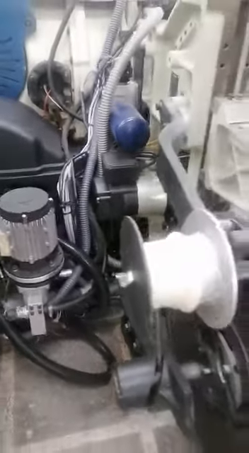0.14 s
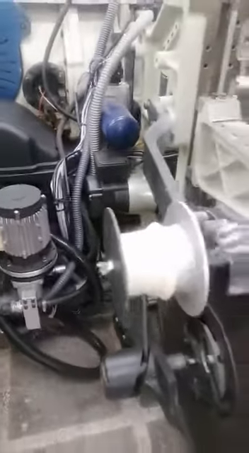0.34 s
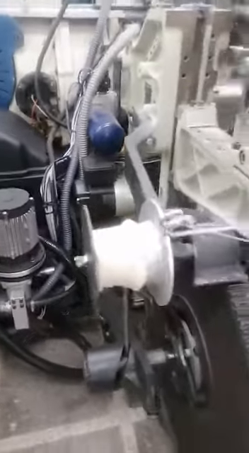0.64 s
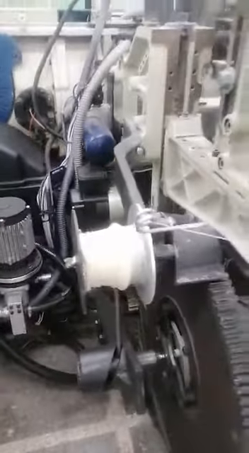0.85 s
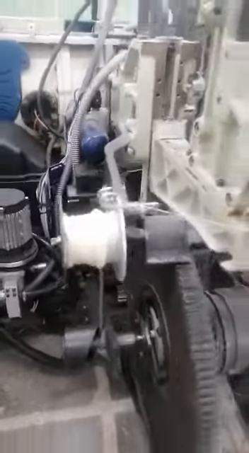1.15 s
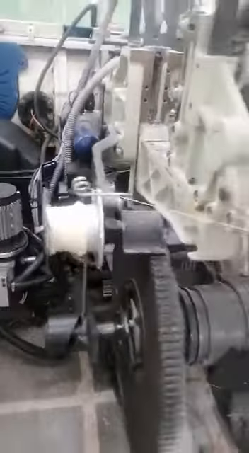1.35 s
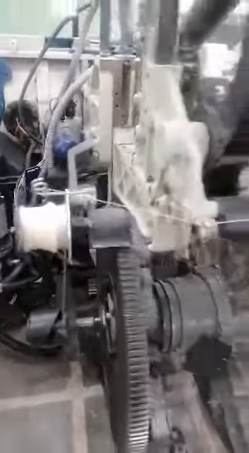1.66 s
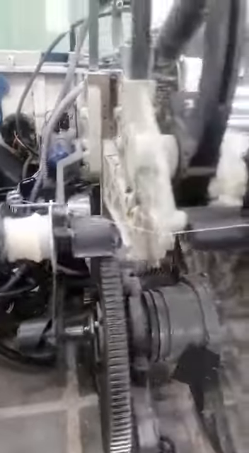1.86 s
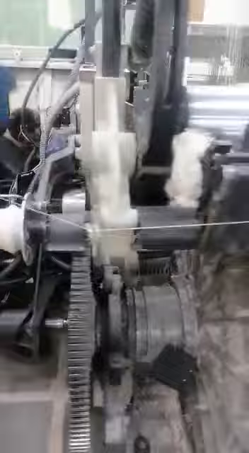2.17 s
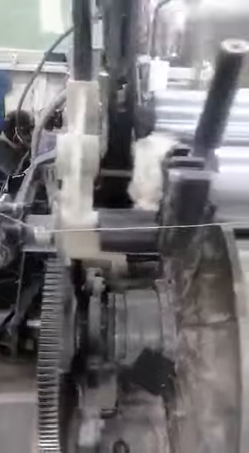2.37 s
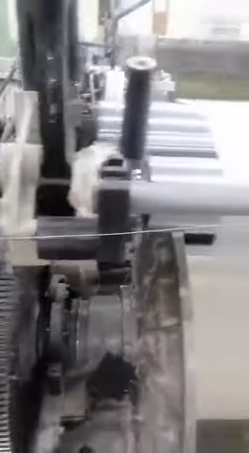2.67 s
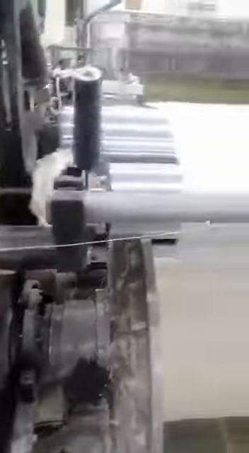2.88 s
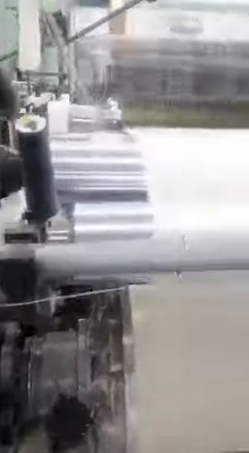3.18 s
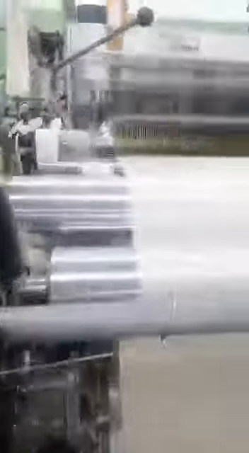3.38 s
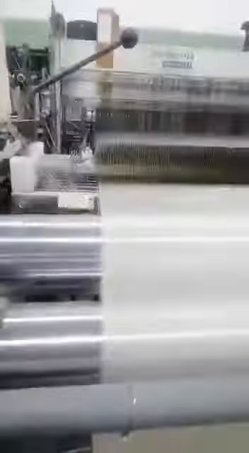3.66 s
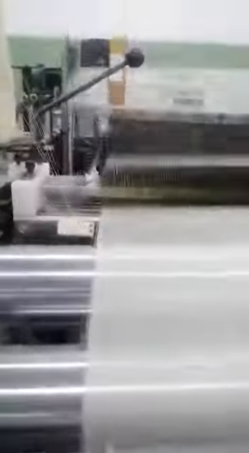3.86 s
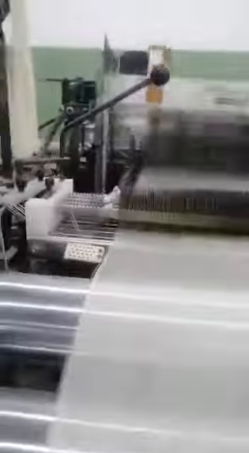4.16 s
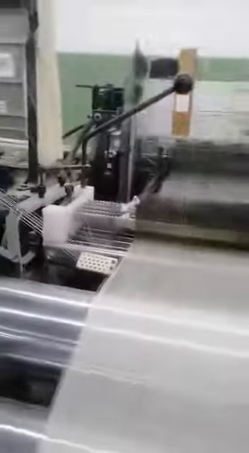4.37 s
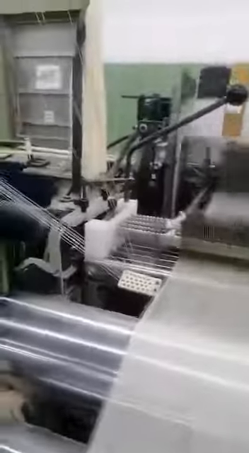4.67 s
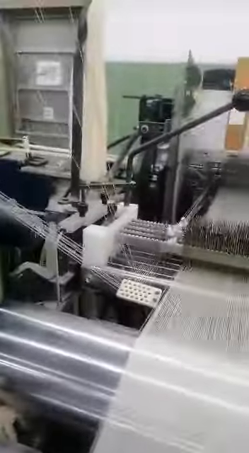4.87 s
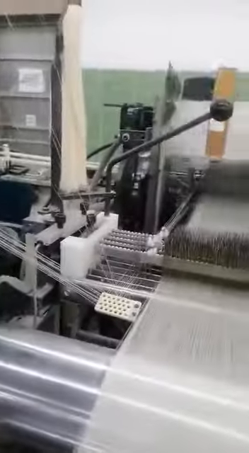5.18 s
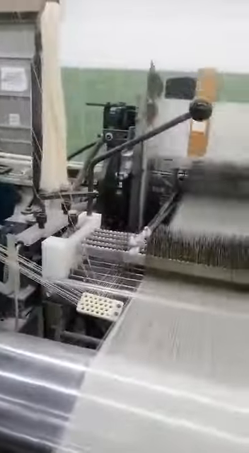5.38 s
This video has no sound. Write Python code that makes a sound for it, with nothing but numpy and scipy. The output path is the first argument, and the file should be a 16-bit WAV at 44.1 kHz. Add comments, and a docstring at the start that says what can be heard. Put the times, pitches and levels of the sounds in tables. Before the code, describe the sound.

From 0 to about 5.5 seconds, weaving looms run continuously at production speed in a large factory hall. Close by, a loom frame hums low and rough, throbbing rapidly at about 7.5 beats per second, more a blurred chugging than separate knocks. Around it, the other looms merge into a wide, diffuse roar, strongest in the low mids and faintly pulsing with the machine cycle. A hollow, noisy metallic ring wavers above: moderate at first, weaker near 2 seconds, most noticeable around 3, dipping at 3.5 and returning near 4.2. Heddles and drop wires form a bright, dense hiss with tiny fast swells, almost constant throughout. Between roughly 1 and 4.7 seconds the stereo microphones move from the drive end past the big gear to the warp, changing the hum's colour gradually. The image is wide, slightly heavier on the left, with uneven, mildly coloured treble. Nothing starts or stops.

```python
"""In a factory hall, weaving looms run while two microphones are carried along the nearest one.
Its frame hums on multiples of the pick rate, lined up by a few knocks so that the hum throbs.
The other looms make a roar of shaped noise, and a few narrow bands of noise ring over it.
Heddles and drop wires are a bright hiss of noise that swells several times in each shed cycle."""
import sys
import numpy as np
from scipy import signal
from scipy.fft import rfft, irfft, next_fast_len
from scipy.io import wavfile
from scipy.ndimage import uniform_filter1d

SR = 44100
rng = np.random.default_rng(int(sys.argv[2]) if len(sys.argv) > 2 else 0)


def inscribe(sig):
    """Save sig as 16-bit PCM at rate SR to the path in sys.argv[1].

    A 1-D sig is mono; a 2-D sig holds one channel per row.
    Samples are clipped to [-1, 1] before scaling.
    """
    pcm = np.round(np.clip(np.atleast_2d(sig).T, -1, 1) * 32767)
    wavfile.write(sys.argv[1], SR, pcm.astype(np.int16))


N = 243873  # length in samples

PICKS_PER_S = 7.5
SHED_CYCLE_S = 2 / PICKS_PER_S  # one shed cycle is two picks
LOWEST_MULTIPLE, HIGHEST_MULTIPLE = 3, 42  # of the pick rate
MIC_SPACING_M, SOUND_M_PER_S = .17, 343
TOP_EDGE_HZ = 15200

# Ringing knocks within one pick, used only to line up the hum. Each row: seconds after the start of the
# pick, ring in Hz, width in Hz, then relative weight in dB at the drive end, big gear and warp.
FRAME_KNOCKS = [(0.0081, 77, 59, -10, -7, -9), (0.0237, 240, 27, -16, -15, -3), (0.0459, 115, 20, 0, 0, 0),
                (0.0517, 182, 16, -9, -2, -10), (0.0558, 270, 38, -21, -7, -4),
                (0.089, 63, 72, -12, -10, -14), (0.0929, 281, 55, -11, -9, -3),
                (0.0975, 125, 48, -6, -12, -8)]
# The walk along the loom. Each row: time in seconds, place (0 drive end, 1 big gear, 2 warp; held at 2 above).
WALK_ALONG_LOOM = [(0, 0.02), (.9, 0.043), (2.6, 0.93), (4.7, 2.45), (5.6, 2.4)]
# Multiples of the pick rate whose level stands above or below the slope. Each row: multiple, then
# rms level in dB before the microphone colour at the drive end, big gear and warp.
HUM_OFF_SLOPE = [(3, -52, -52, -52), (4, -63, -65, -61), (8, -43, -44, -44), (10, -54, -55, -65),
                 (11, -50, -57, -68), (14, -42, -45, -51), (16, -41, -47, -46), (17, -43, -46, -57),
                 (19, -47, -48, -44), (20, -53, -43, -43), (22, -50, -42, -48), (23, -42, -42, -47),
                 (24, -37, -41, -45), (26, -30, -39, -43), (28, -47, -40, -43), (30, -48, -42, -52),
                 (31, -46, -38, -42), (32, -44, -43, -39), (40, -43, -54, -44)]
# Slope for every other multiple. Each row: pitch in Hz, rms level in dB before the microphone colour.
HUM_SLOPE = [(30, -55), (70, -55.5), (300, -52)]
# Narrow ringing bands. Each row: centre in Hz, width in Hz, relative strength in dB.
RINGING_BANDS = [(771, 89, -1.5), (853, 51, 0.5), (974, 78, -7)]
# Loudness of the ringing. Each row: time in seconds, level in dB.
RINGING_LEVEL = [(0, -37), (.7, -34), (2.1, -40), (3, -31.5), (3.5, -38.5), (4.2, -33.5), (4.8, -36.5),
                 (5.53, -33.5)]
# Colour of the hall roar. Each row: pitch in Hz, relative strength per Hz in dB.
ROAR_COLOUR = [(18, -30), (40, -14), (86, -8.5), (110, -8), (200, -1), (300, -1), (400, -1.5), (600, -5),
               (850, -4), (1200, -8), (2000, -13.5), (2500, -9), (3500, -24), (4500, -69)]
# Loudness of the roar. Each row: time in seconds, level in dB.
ROAR_LOUDNESS = [(0, -26.5), (1, -26), (5, -26), (5.53, -26)]
# How much noise power repeats with the shed cycle. Each row: pitch in Hz, share from 0 to 1.
REPEATING_SHARE = [(60, .1), (200, .35), (300, .4), (400, .5), (800, .35), (1300, .1), (2000, .01)]
# Colour of the heddle and wire rattle. Each row: pitch in Hz, relative strength per Hz in dB.
RATTLE_COLOUR = [(1760, -44), (3000, -5.5), (3680, -7), (4220, -3), (5930, -5), (6840, -1), (8630, -0.5),
                 (9890, -1.5), (10900, -6), (14600, -11), (15300, -9)]
# Loudness of the rattle. Each row: time in seconds, level in dB.
RATTLE_LOUDNESS = [(0, -29.5), (1.1, -28.5), (1.37, -29.5), (1.6, -29), (4.9, -28.5), (5.53, -28.5)]
# Rattle swells in a shed cycle. Each row: centre in seconds, relative rise in dB, spread in seconds.
SHED_SWELLS = [(.0, .6, .012), (.062, 1.5, .018), (.125, .9, .02), (.185, .4, .012)]
# Balance of the microphones. Each row: pitch in Hz, left over right in dB.
LEFT_OVER_RIGHT_DB = [(60, 3.5), (92, 1.5), (140, 2.5), (210, 2), (330, 2.5), (500, 3.5), (770, 2.5),
                      (1170, 3), (1790, 5), (2740, 2), (4190, -1.5), (6410, 0), (9810, 2), (15000, 1)]
# Ripples of the case around each microphone, left list then right list.
# Each row: centre in Hz, width in Hz, height in dB.
CASE_RIPPLES = [
    [(1410, 270, -3.5), (5220, 350, 3.5), (5800, 400, 0), (7050, 400, 3), (7600, 430, -4), (8530, 520, 4),
     (9400, 300, 1.7), (10800, 500, -3), (11400, 300, 3.5)],
    [(1690, 210, 3), (2870, 320, -3.8), (3700, 150, -9), (4650, 400, -0.5), (5200, 300, 0.1),
     (6000, 600, 0), (7000, 400, -1.5), (7600, 300, 2), (9250, 400, -5), (9800, 400, 2.5),
     (10800, 500, -0.5)],
]


def gain_of(db):
    """Turns decibels into a gain."""
    return 10 ** (np.asarray(db) / 20)


def evened(x):
    """Scales the sound so that the mean of its channels has rms 1."""
    middle = np.atleast_2d(x).mean(0)
    return x / np.sqrt(np.mean(middle ** 2) + 1e-20)


def read(points, hz):
    """Reads a table by pitch, with straight lines between points on a log-pitch axis."""
    f, value = np.transpose(points)
    return np.interp(np.log(hz + 1), np.log(f + 1), value)


def follow(rows):
    """Reads a table by time, once for every sample."""
    return np.interp(np.arange(N) / SR, *np.transpose(rows))


def resonances(rows, hz, height_of):
    """Adds up rounded peaks over pitch, with each dB value turned into a height by height_of."""
    return sum(height_of(db) / (1 + (2 * (hz - f) / width) ** 2) for f, width, db in rows)


def diffuse(colour, shape=lambda hz: 1):
    """Noise from all sides: the microphones agree only on waves longer than their spacing."""
    size = next_fast_len(N)
    hz = np.fft.rfftfreq(size, 1 / SR)
    a, b, c, d = rng.standard_normal((len(hz), 4)).T
    likeness = np.sinc(2 * hz * MIC_SPACING_M / SOUND_M_PER_S)
    shared = a + 1j * b
    opposite = np.sqrt(1 - likeness) * (c + 1j * d) / np.sqrt(1 + likeness)
    strength = gain_of(read(colour, hz)) * shape(hz)
    left = (shared + opposite) * strength
    right = (shared - opposite) * strength
    return evened(irfft(np.array([left, right]), size)[:, :N])


def unsteady(x, patchy_db, flicker_db):
    """Level drifts in patches of time and pitch, and flickers across wide bands."""
    z = signal.stft(x, nperseg=256, noverlap=192)[2]
    patches, flicker = rng.standard_normal((z.shape[2], 129, 2)).T
    # smooth over pitch bins first, then over time frames
    patches = uniform_filter1d(uniform_filter1d(patches, size=5, axis=0), size=30, axis=1)
    flicker = uniform_filter1d(uniform_filter1d(flicker, size=70, axis=0), size=14, axis=1)
    change_db = patchy_db * patches / patches.std() + flicker_db * flicker / flicker.std()
    changed = signal.istft(z * gain_of(change_db), nperseg=256, noverlap=192)[1]
    return evened(changed[:, :N])


def repeating(hz):
    """Gathers a share of the power on multiples of the shed rate; moving along blurs the higher ones."""
    shed_hz = 1 / SHED_CYCLE_S
    blur_hz = 0.22 + 0.00016 * hz
    count = np.round(hz / shed_hz)
    lines = np.exp(-.5 * ((hz - count * shed_hz) / blur_hz) ** 2)
    lines *= shed_hz / (blur_hz * np.sqrt(2 * np.pi))
    lines *= 1 + 0.3 * (-1) ** count  # multiples of the pick rate are stronger than those between
    share = np.clip(read(REPEATING_SHARE, hz), 0, 1)
    return np.sqrt(1 - share + share * lines)


def knock_starts(hz):
    """Adds the response of all ringing knocks at one pitch, for each of the three places."""
    total = 0
    for s, ring_hz, width_hz, *levels_db in FRAME_KNOCKS:
        delay = np.exp(-2j * np.pi * hz * s)
        resonance = 1 + 2j * (hz - ring_hz) / width_hz
        total = total + gain_of(levels_db) * delay / resonance
    return total / abs(total)  # keep the phase only


def frame():
    """Multiples of the pick rate take their phases from the same few knocks, so the hum throbs."""
    t = np.arange(N) / SR
    place, places = np.clip(follow(WALK_ALONG_LOOM), 0, 2), (0, 1, 2)
    off_slope = {multiple: levels_db for multiple, *levels_db in HUM_OFF_SLOPE}
    out = np.zeros((2, N))
    for multiple in range(LOWEST_MULTIPLE, HIGHEST_MULTIPLE + 1):
        hz = multiple * PICKS_PER_S
        start = np.interp(place, places, knock_starts(hz))
        levels_db = off_slope.get(multiple, read(HUM_SLOPE, hz)) + np.zeros(3)
        rms = np.interp(place, places, gain_of(levels_db))
        # each multiple comes from another part of the frame, nearer to one microphone or the other
        nearness = .7 * rng.standard_normal()
        lead = np.pi * hz * MIC_SPACING_M / SOUND_M_PER_S * nearness * np.array([[1], [-1]])
        out += np.sqrt(2) * rms * np.cos(2 * np.pi * hz * t + np.angle(start) + lead)
    return out


def ring():
    """Noise through narrow resonances, partly repeating with the shed, with a flickering level."""
    def shape(hz):
        return resonances(RINGING_BANDS, hz, gain_of) * repeating(hz)

    flat = [(20, 0), (20000, 0)]
    shaken = diffuse(flat, shape)
    return gain_of(follow(RINGING_LEVEL)) * unsteady(shaken, patchy_db=1.1, flicker_db=1.5)


def roar():
    """All the looms of the hall, mixed by its walls: noise from all sides that partly repeats."""
    mixed = diffuse(ROAR_COLOUR, repeating)
    return gain_of(follow(ROAR_LOUDNESS)) * unsteady(mixed, patchy_db=0.6, flicker_db=0.48)


def rattle():
    """Small metal parts blend into bright noise, louder around set moments of each shed cycle."""
    t = np.arange(N) / SR
    swells_db = np.zeros(N)
    for centre_s, db, spread_s in SHED_SWELLS:
        # time to the nearest repeat of this swell
        away = (t - centre_s + SHED_CYCLE_S / 2) % SHED_CYCLE_S - SHED_CYCLE_S / 2
        swells_db += db * np.exp(-.5 * (away / spread_s) ** 2)
    hiss = unsteady(diffuse(RATTLE_COLOUR), patchy_db=0.64, flicker_db=0.45)
    return gain_of(follow(RATTLE_LOUDNESS)) * evened(hiss * gain_of(swells_db))


def scene():
    """Adds the near loom's frame, the ringing, the hall roar and the rattle."""
    return frame() + ring() + roar() + rattle()


def record(dry):
    """Gives each microphone its own balance and case colour, then cuts off the top of the treble."""
    size = next_fast_len(N)
    hz = np.fft.rfftfreq(size, 1 / SR)
    # half the difference goes up on the left and half goes down on the right
    balance_db = read(LEFT_OVER_RIGHT_DB, hz) / 2 * np.array([[1], [-1]])
    case_db = [resonances(side, hz, lambda db: db) for side in CASE_RIPPLES]
    wet = irfft(rfft(dry, size) * gain_of(balance_db + case_db), size)[:, :N]
    low_pass = signal.firwin(511, TOP_EDGE_HZ, window=("kaiser", 9), fs=SR)
    return signal.oaconvolve(wet, low_pass[None], "same")


dry = scene()
out = record(dry)
inscribe(out)
```